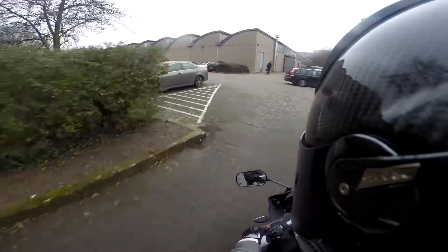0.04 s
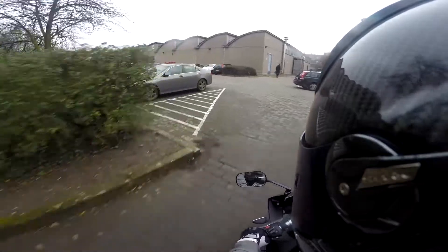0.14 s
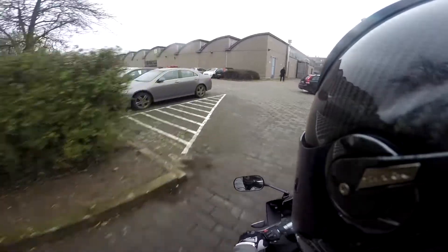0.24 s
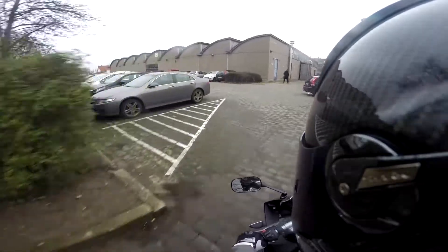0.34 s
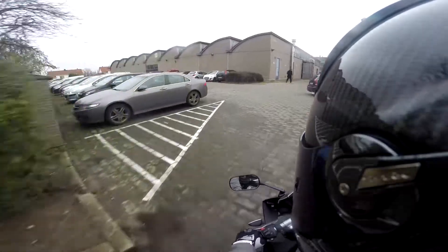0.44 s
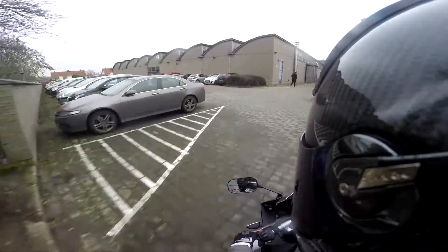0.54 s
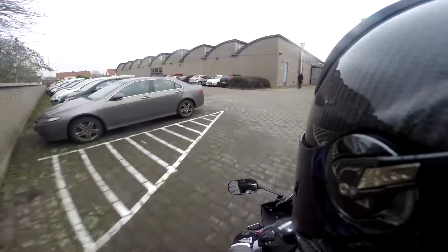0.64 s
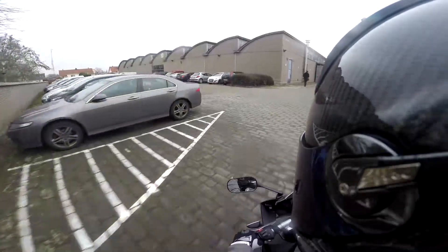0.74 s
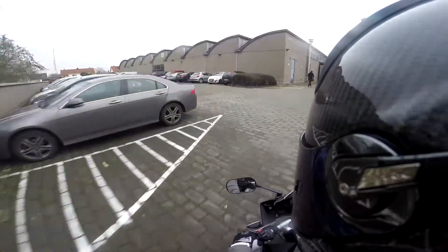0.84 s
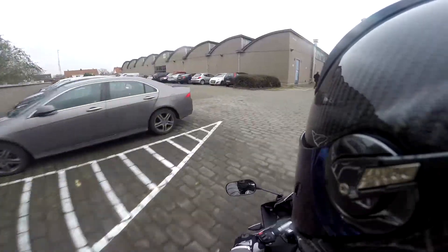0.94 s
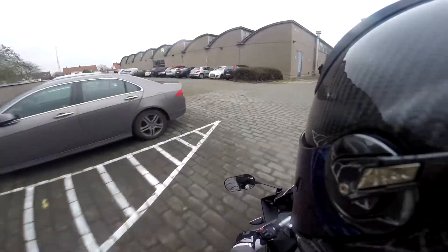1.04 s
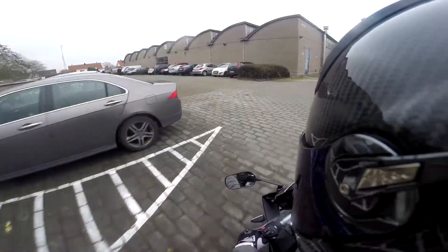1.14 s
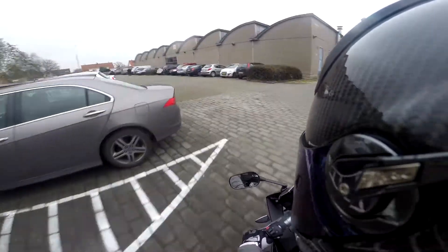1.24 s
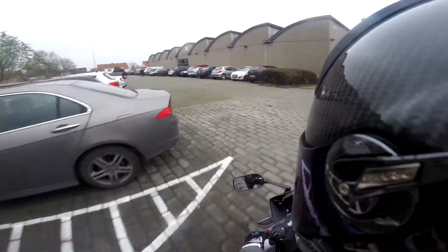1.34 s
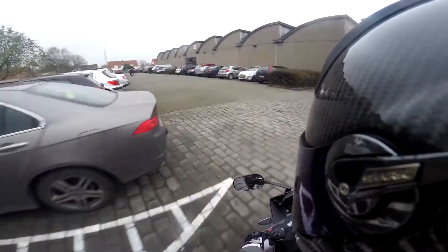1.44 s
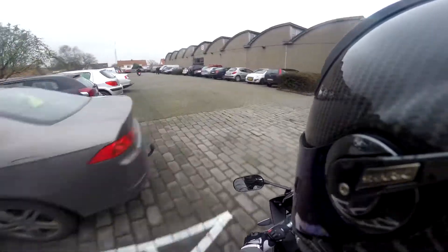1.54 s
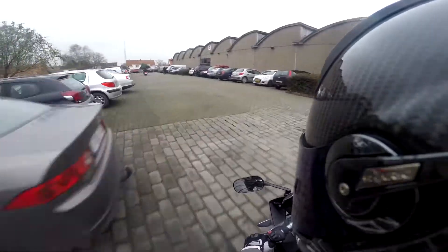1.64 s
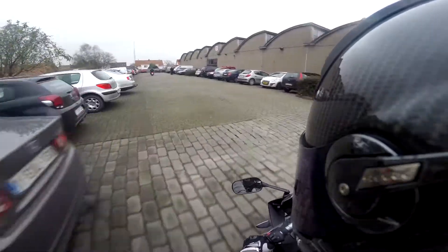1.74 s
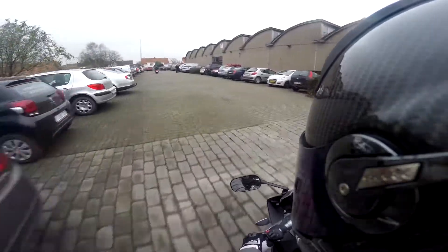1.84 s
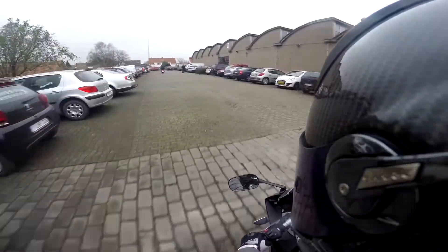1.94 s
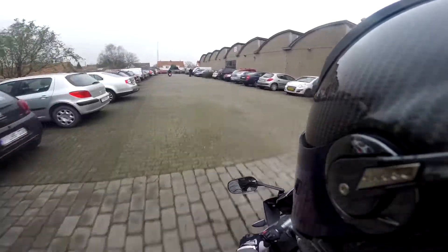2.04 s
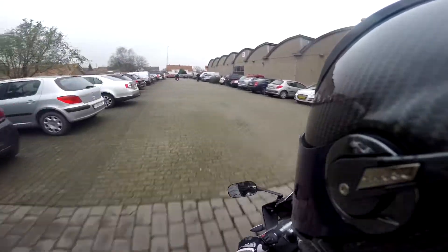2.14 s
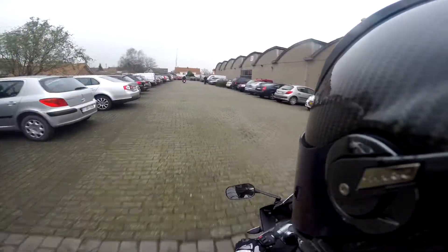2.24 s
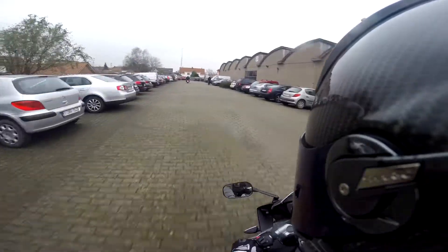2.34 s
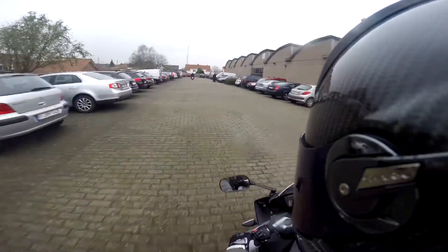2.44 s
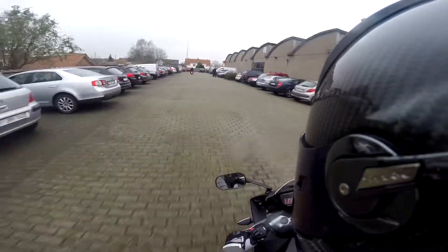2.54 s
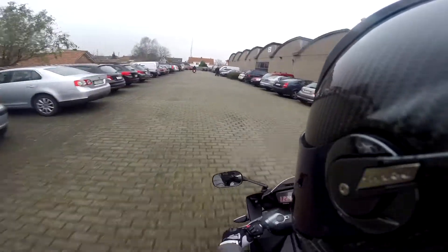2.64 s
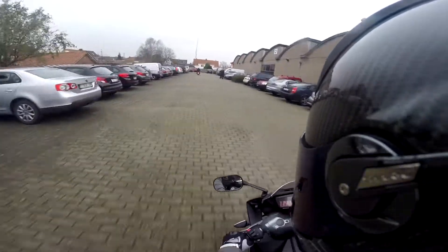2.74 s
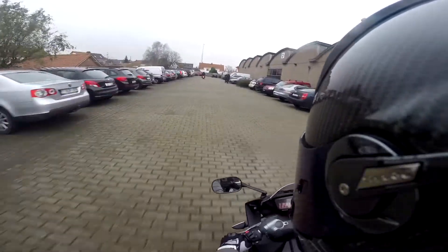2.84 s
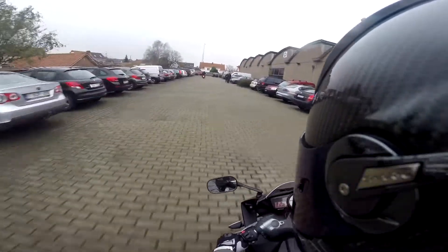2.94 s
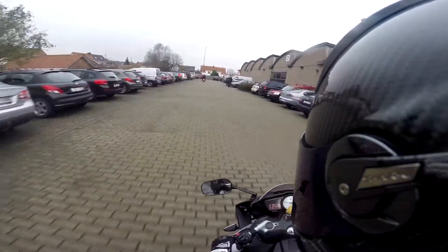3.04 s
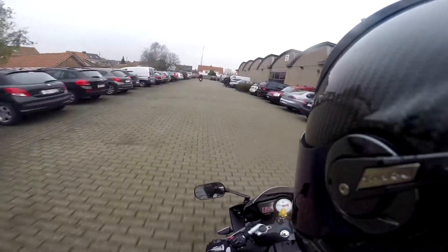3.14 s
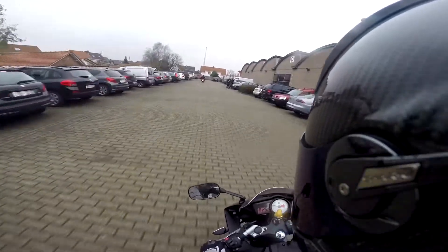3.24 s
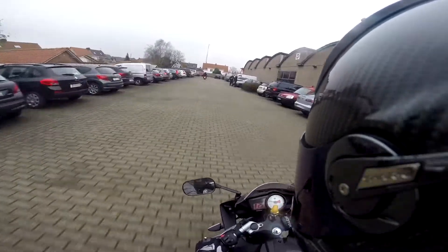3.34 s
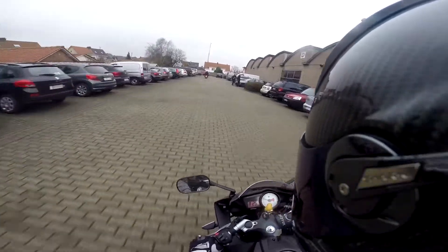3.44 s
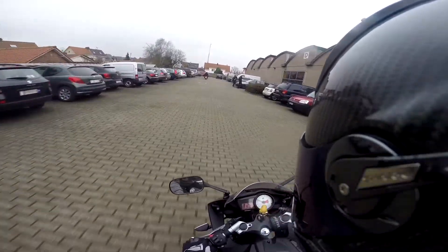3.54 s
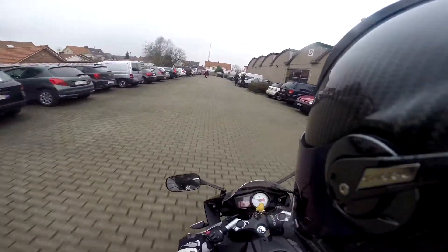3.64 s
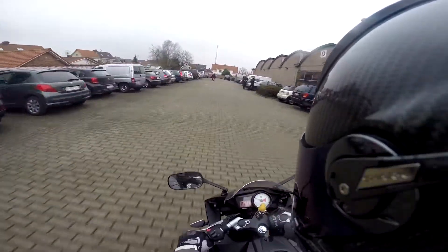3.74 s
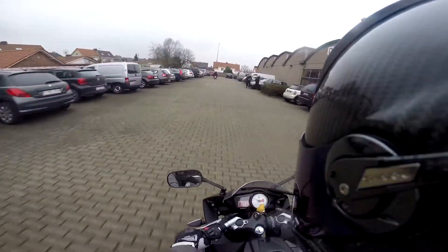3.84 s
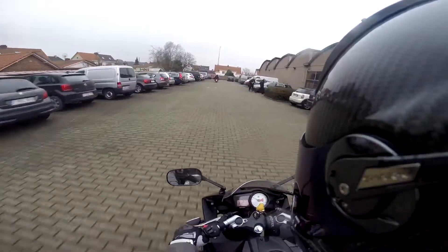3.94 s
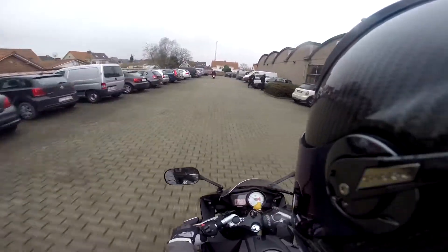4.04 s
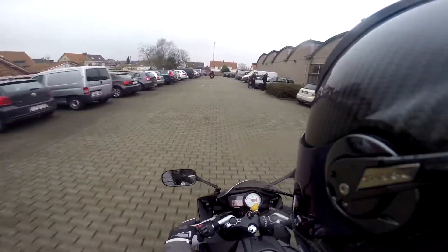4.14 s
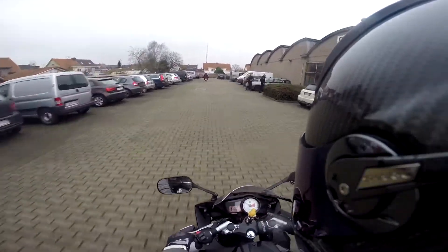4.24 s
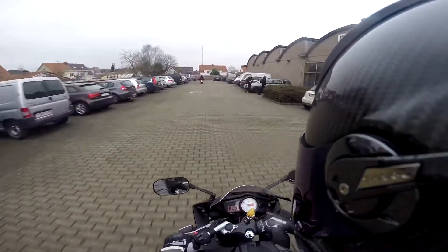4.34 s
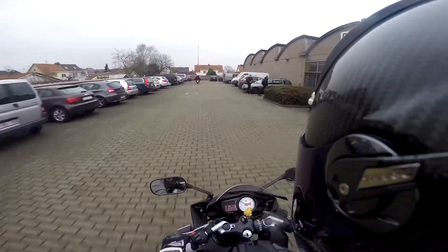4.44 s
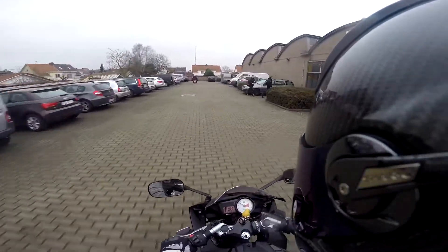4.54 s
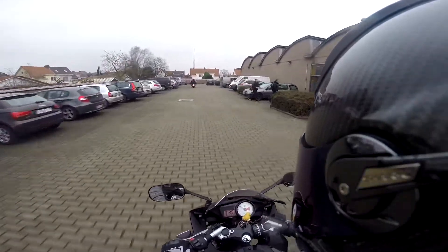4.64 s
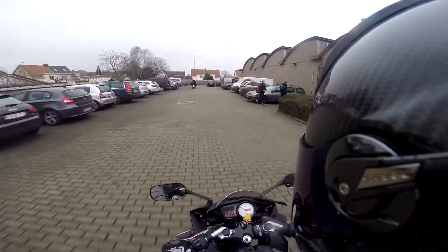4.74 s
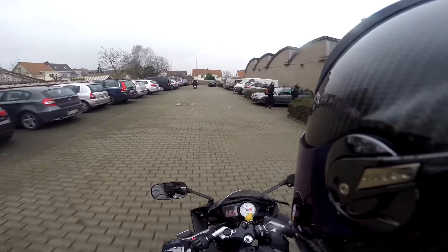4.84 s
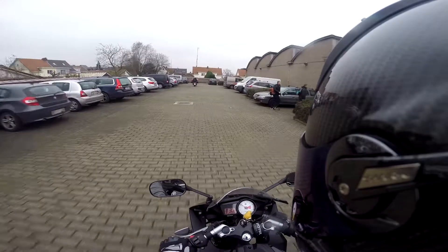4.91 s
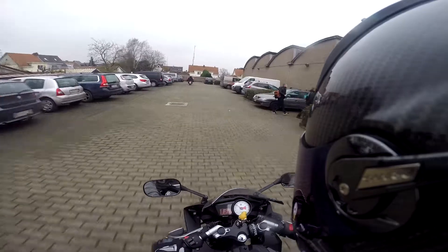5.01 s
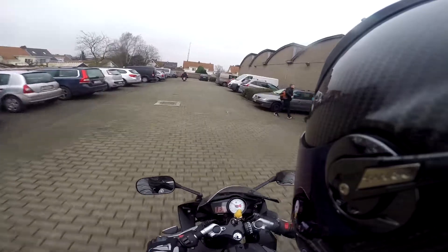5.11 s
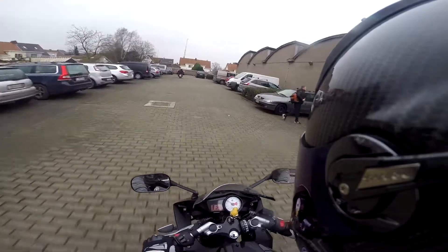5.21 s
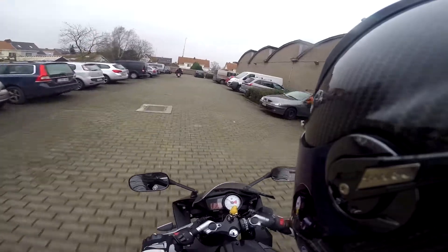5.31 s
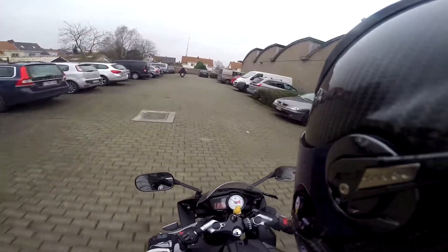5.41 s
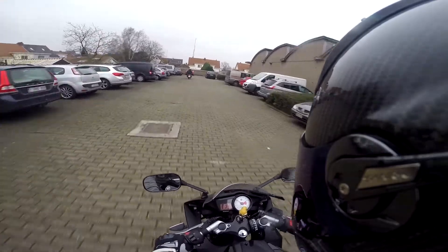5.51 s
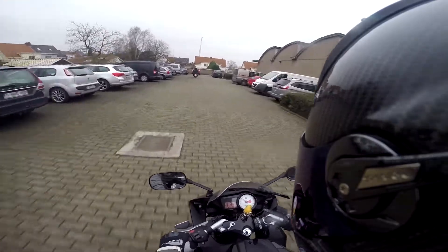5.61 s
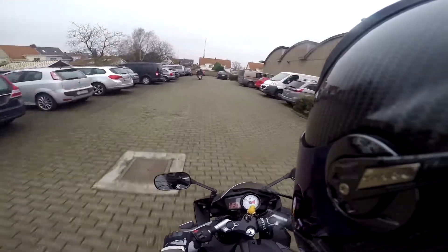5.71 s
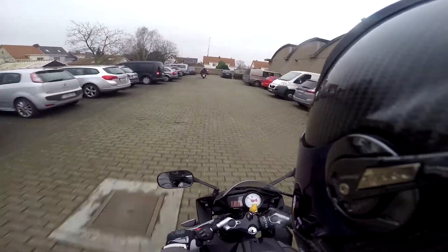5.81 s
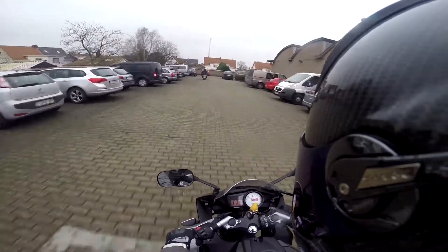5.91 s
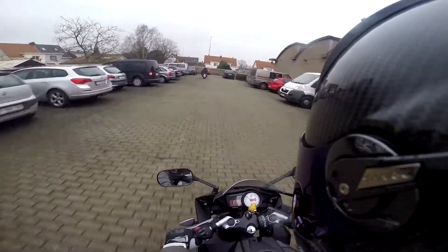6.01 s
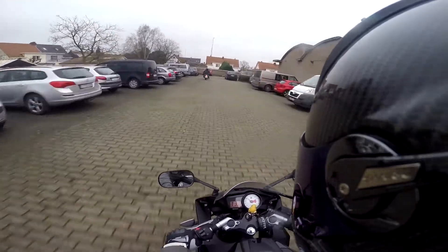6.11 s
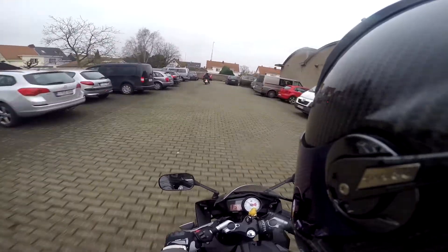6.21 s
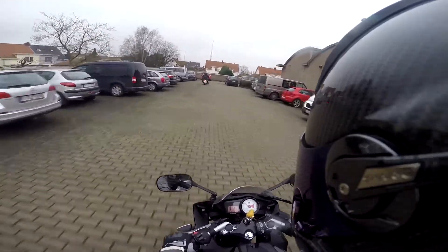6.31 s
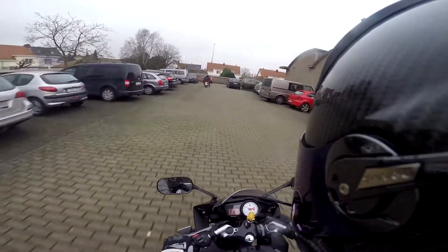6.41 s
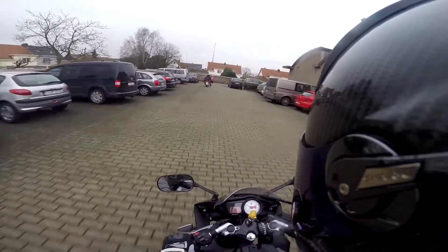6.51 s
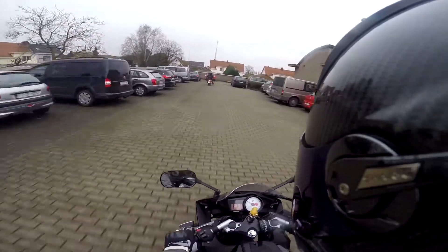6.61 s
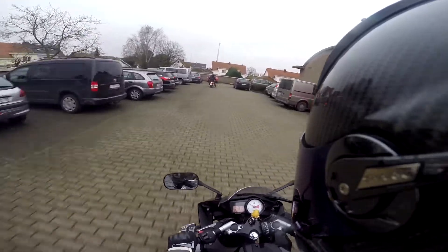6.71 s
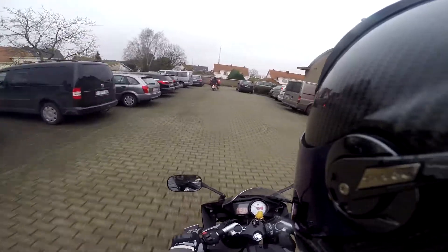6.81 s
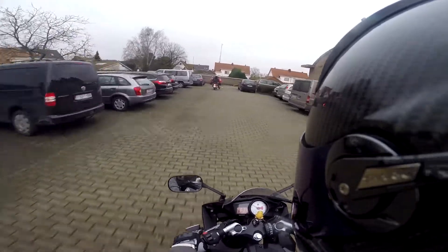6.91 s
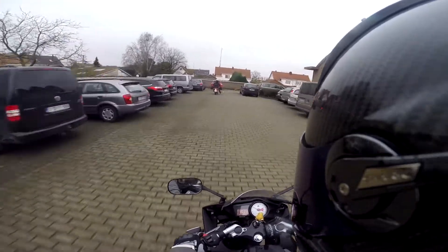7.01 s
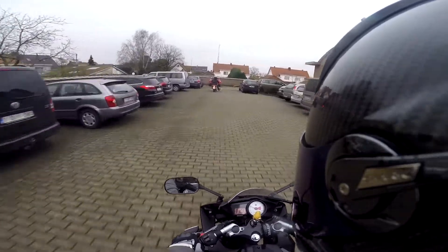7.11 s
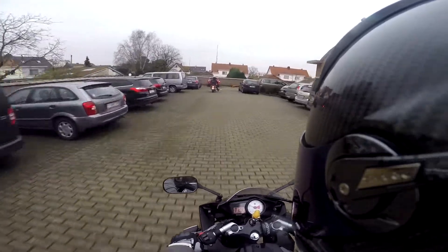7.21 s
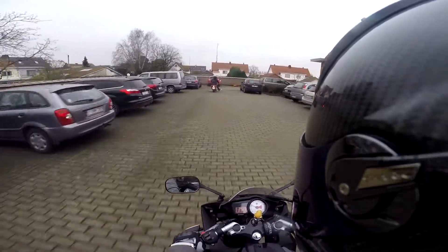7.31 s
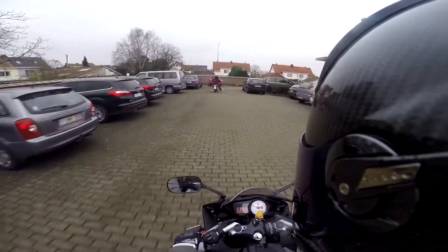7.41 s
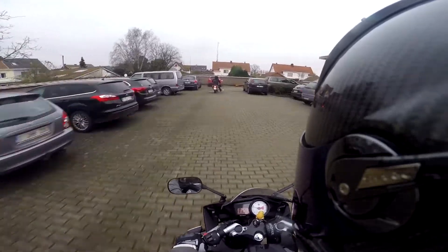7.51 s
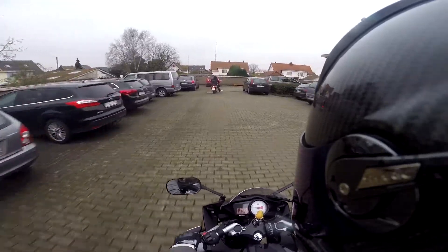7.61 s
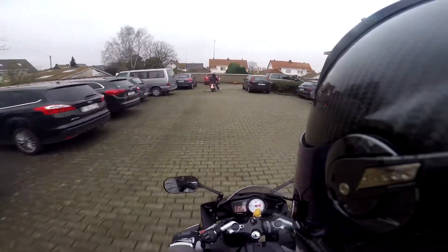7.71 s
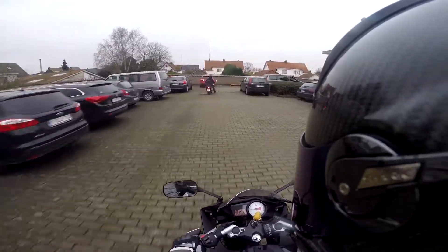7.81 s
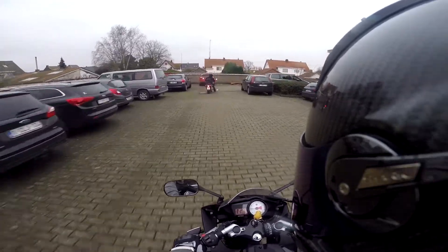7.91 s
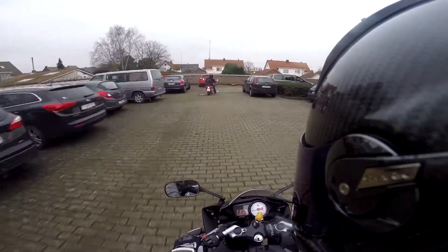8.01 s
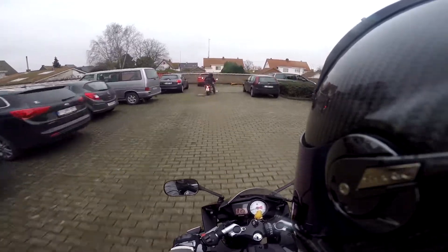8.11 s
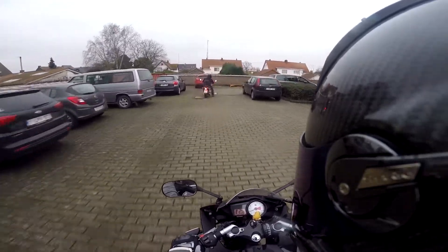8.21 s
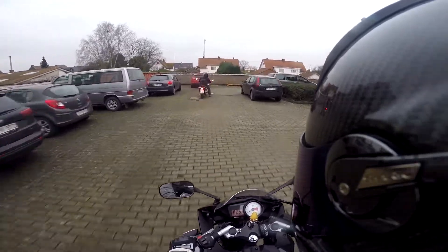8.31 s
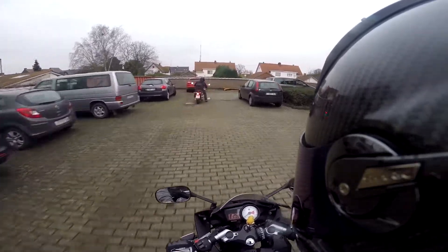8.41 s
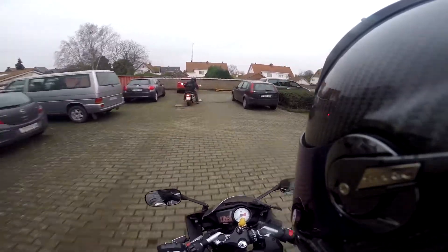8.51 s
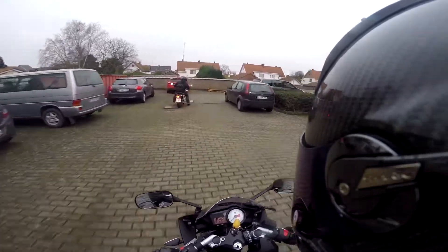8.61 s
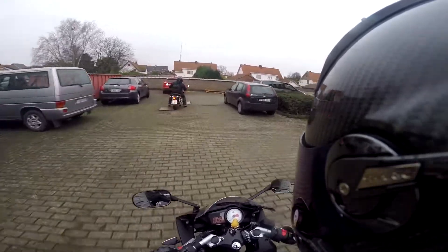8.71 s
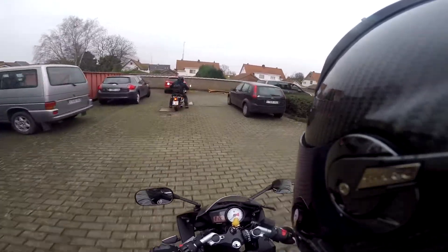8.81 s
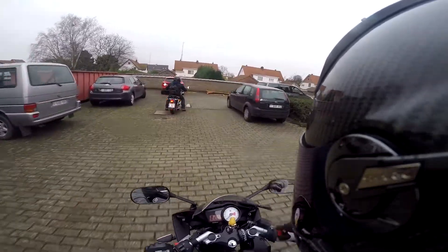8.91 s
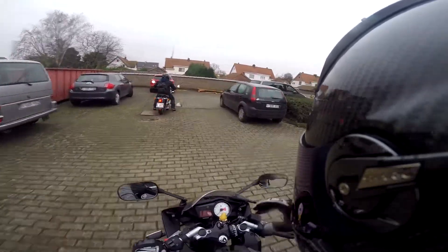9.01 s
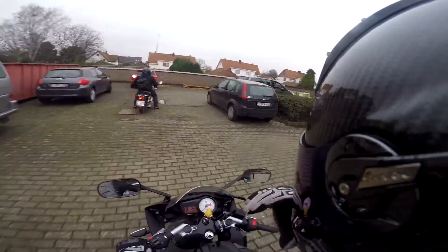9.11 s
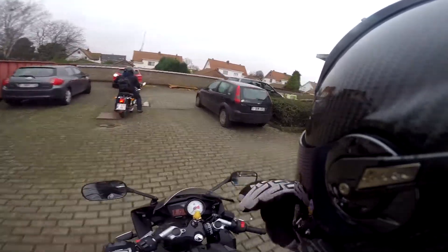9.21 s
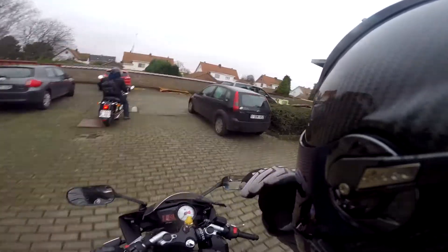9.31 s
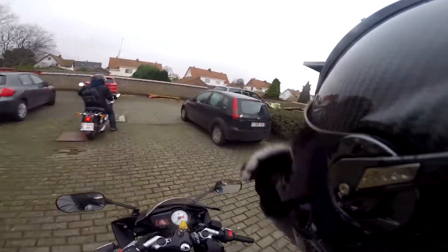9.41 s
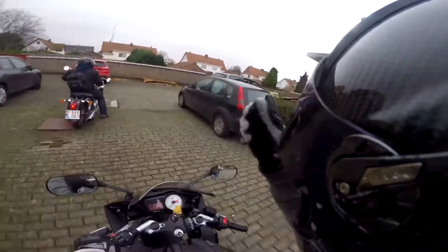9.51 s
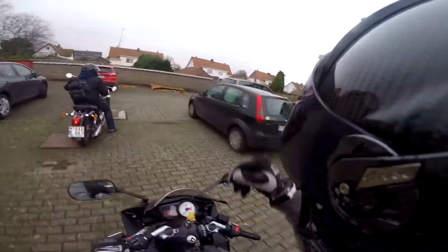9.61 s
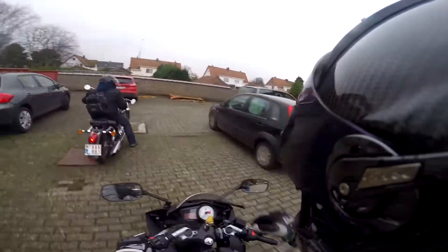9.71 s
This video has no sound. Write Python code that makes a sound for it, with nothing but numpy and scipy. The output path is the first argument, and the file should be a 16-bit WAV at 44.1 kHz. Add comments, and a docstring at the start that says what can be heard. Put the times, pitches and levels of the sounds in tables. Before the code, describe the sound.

A single-cylinder motorcycle putters through a paved car park under strong wind hiss, slows to idle, then a hand knocks loudly on the camera.

```python
"""A single-cylinder motorcycle rolls through a paved car park, heard by a helmet camera in a sealed housing.
It starts with a faint whirr; each firing rings the pipe and barks while the throttle is open. As the wind rises
it hisses in the housing's resonances, the mount shudders in the deep bass and grit ticks. When the throttle
shuts the bark dies; a rough hum and a squeak mark the braking, and at the stop a gloved hand brushes and knocks
the camera. A faint electronic whine and preamp hiss run throughout."""
import sys
import numpy as np
from scipy import signal
from scipy.fft import rfft, irfft
from scipy.io import wavfile
from scipy.ndimage import uniform_filter1d

SR = 44100
rng = np.random.default_rng(int(sys.argv[2]) if len(sys.argv) > 2 else 0)


def master_out(mix):
    """Clip the mix to full scale and print it as 16-bit PCM to the path in sys.argv[1]."""
    frames = np.transpose(np.atleast_2d(mix))
    ceiling = np.clip(frames, -1, 1)
    pcm = np.round(ceiling * 32767).astype(np.int16)
    wavfile.write(sys.argv[1], SR, pcm)


N = 429975
T = np.arange(N) / SR  # time of every sample [s]

# Firing rate before surge and wander: (time [s], rate [Hz])
FIRING_RATE = [(0.0, 32.02), (0.37, 32.05), (0.6, 29.09), (0.85, 29.23), (1.12, 31.37), (1.25, 29.93),
               (1.68, 29.98), (2.17, 31.55), (3.13, 37.15), (3.37, 39.2), (4.2, 41.69), (4.42, 42.71),
               (4.9, 43.42), (6.05, 42.78), (6.38, 38.23), (6.5, 41.53), (6.72, 38.81), (7.2, 37.16),
               (7.5, 32.69), (8.1, 17.95), (8.65, 13.86), (9.75, 13.68)]
# Surge as the chain winds and unwinds under pull: (first dip [s], middle [s], half span [s])
SURGE_SPAN = (2.17, 3.0, 1.15)
# Firings of set strength: (time [s], level [dB])
WEAK_FIRINGS = [(.415, -10), (6.19, -7)]
# Engine at the microphone: (time [s], pipe level [dB], bark level without rasp [dB])
ENGINE_LEVEL = [(0, -45.5, -53), (.9, -42, -47), (1.8, -44, -48), (2.3, -41.5, -45.5), (2.65, -40.5, -42.5),
                (3.4, -38.5, -42), (4.3, -43.5, -44.5), (5.1, -45.5, -46), (6.16, -44.5, -47.5),
                (6.19, -47, -56), (6.32, -41, -79), (7.0, -41, -65), (7.2, -40, -71), (7.55, -41, -70),
                (7.85, -47.5, -72), (8.3, -48, -75), (9.15, -48, -69)]
# Piston shake at twice the crank speed: (time [s], pulse size [share of a firing])
PISTON_SHAKE = [(0, 0.018), (3.5, 0.013), (4.5, 0.22), (6.15, 0.15), (6.3, 0.37), (7.2, 0.25), (7.7, 0.059),
                (8.1, .01)]
# Pipe resonances, throttle open: (frequency [Hz], width [Hz], relative level [dB])
PIPE_OPEN = [(82, 44, -3.5), (160.2, 21, 6.5), (211, 28.4, 2)]
# Pipe resonances, throttle shut: (frequency [Hz], width [Hz], relative level [dB])
PIPE_SHUT = [(84, 15, -13), (117, 51, -0.5), (143, 24.5, 7), (185, 25, -31)]
# Pipe rings that fade as the revs rise: (frequency [Hz], width [Hz], relative level [dB])
SLOW_PIPE = [(140.4, 28, 4), (177, 19, -8)]
# Pipe ring that comes out at idle: (frequency [Hz], width [Hz], relative level [dB])
IDLE_PIPE = [(205, 35, -15.5)]
# Bark resonances struck by each firing: (frequency [Hz], width [Hz], relative level [dB])
BARK = [(383, 49, -3.5), (439, 49, 4.5)]
# Bark rings that fade as the revs rise: (frequency [Hz], width [Hz], relative level [dB])
SLOW_BARK = [(322, 140, -0.38)]
# Upper bark rung by the gas puffs: (frequency [Hz], width [Hz], relative level [dB])
PUFF_BARK = [(577, 81, -1), (980, 790, -9.5)]
# Ring that each firing strikes cleanly: (frequency [Hz], width [Hz], relative level [dB])
CLEAN_BARK = [(585, 74, -6.5)]
# Rasp on the firings: (time [s], level relative to the bark [dB])
RASP_LEVEL = [(0, -7), (.5, -7.5), (2.0, -9), (2.4, -5.5), (2.9, -6.5), (3.4, -22), (4.5, -18), (6.2, -11)]

# Wind hiss, following road speed: (time [s], level [dB])
WIND_LEVEL = [(0, -58.5), (.65, -52), (.72, -46), (1.1, -43.5), (1.42, -45), (1.63, -48), (1.72, -42),
              (2.1, -41), (2.35, -30.5), (2.75, -34), (2.95, -31.5), (3.45, -29), (3.95, -30.5),
              (4.8, -28.5), (5.03, -30.5), (5.4, -33.5), (5.62, -33.5), (5.82, -33.5), (6.02, -33),
              (6.11, -37), (6.25, -29), (6.65, -34.5), (7.05, -39.5), (7.4, -36), (7.9, -37.5), (8.4, -45),
              (8.87, -45.5), (8.97, -54), (9.2, -50), (9.75, -58.5)]
# Strongest puffs of wind: (time [s], level over the hiss [dB])
WIND_PUFFS = [(.78, 2.5), (.97, 3), (1.05, 2.5), (1.76, 1.5), (2.68, 6), (2.91, 4), (3.23, 3), (4.22, 1),
              (4.64, 2.5), (4.83, 3.5), (5.22, 3), (5.59, 3), (6.44, 0), (6.74, 2.5), (7.63, 1), (7.95, 4),
              (8.21, 4), (8.45, 1.5)]
# Glove brushing over the housing: (time [s], level [dB])
BRUSH_LEVEL = [(9.29, -67), (9.33, -42), (9.365, -45), (9.39, -39), (9.425, -43.5), (9.6, -51), (9.63, -76)]
# Hiss spectrum before the housing: (frequency [Hz], relative density [dB per Hz])
WIND_COLOUR = [(60, -18.5), (200, -18.5), (450, -21.5), (750, -23), (1100, -21), (1900, -12), (2900, -13),
               (4000, -24), (4700, -32), (6300, -32), (6800, -36.5), (9000, -42.5), (15000, -63.5)]
# Resonances of the sealed housing: (frequency [Hz], width [Hz], boost [dB])
HOUSING = [(1581, 177, 19), (2373, 350, 4.5), (3609, 370, 12), (5190, 580, 5.5), (6000, 350, 6)]
# Road rumble spectrum: (frequency [Hz], relative density [dB per Hz])
RUMBLE_COLOUR = [(20, 28), (60, -7), (90, -5), (130, 3), (300, 7.5), (560, -4.5), (750, -1), (1500, -23)]

# Drive of the mount by the road: (time [s], level [dB])
SHUDDER_LEVEL = [(0, -44), (.45, -46), (.7, -38), (1.4, -39), (1.7, -46), (2.2, -37.5), (2.6, -33),
                 (3.3, -46), (3.75, -35), (3.95, -30), (4.12, -25.5), (4.3, -38), (4.5, -30.5),
                 (4.75, -39.5), (5.8, -40), (6.7, -36.5), (7.7, -36), (7.9, -46), (9.17, -40)]
# Frame drumming over the paving joints: (time [s], level [dB])
DRUM_LEVEL = [(0, -64), (.8, -54), (2.2, -52), (2.75, -47), (3.3, -45.5), (3.62, -37.5), (3.8, -46.5),
              (4.2, -56), (4.4, -45), (4.9, -47), (5.9, -48.5), (6.15, -54), (6.3, -46), (6.6, -59),
              (7.0, -57), (7.6, -45), (7.9, -50), (9.1, -56)]
# Jolts that set the mount swinging, road bumps, then shoves of the hand: (time [s], drive level [dB])
JOLTS = [(.645, -23), (0.903, -22), (2.27, -27), (2.462, -20), (3.04, -18.5), (4.37, -19), (9.203, -9),
         (9.338, -7.5), (9.44, 2.2), (9.511, 3.8), (9.539, -7.5), (9.642, -7)]

# Hand on the camera: (time [s], drive level [dB], then low, middle and top groups over that drive [dB])
KNOCKS = [(9.131, -37.5, -20, -12, -21), (9.353, -40, -2, -5, -29), (9.4024, -34, -4, 3, -3),
          (9.436, -13.5, -6, 2, -16.5), (9.4515, -15, -11, -15, -16), (9.47, -32, -19, 7, -17),
          (9.4791, -26.5, -9, -1, -8), (9.4841, -24, -6, -6, -21), (9.498, -17.5, -13, -6, -15),
          (9.5147, -25, 1.5, 5, -10), (9.5191, -13, -12, -2.5, -16), (9.5304, -33, -24, -4, -17),
          (9.5407, -39, 5, 6, -4), (9.5507, -37, -6, -7, -1), (9.568, -53.5, 11, 12, 16),
          (9.582, -59, -4, -9, -13), (9.5996, -48, -12, -10, -3), (9.608, -44.5, -19, -20, 0.5),
          (9.628, -52, -3, -4, -3), (9.702, -45.5, -8, -12, 1)]
# Housing rings in four groups, low to top: (frequency [Hz], width [Hz], relative level [dB])
KNOCK_RINGS = [
    [(110, 29, 29), (307, 27, 29.5), (528, 32, 24)],
    [(909, 21, 18), (1025, 147, 11.5), (1140, 97, 17.5), (1505, 130, 17)],
    [(2380, 160, 20.5), (1920, 760, 7)],
    [(4630, 430, 10.5), (5280, 330, 10), (6360, 590, -13)],
]
# What the housing passes of each group: (lower edge [Hz], upper edge [Hz])
KNOCK_EDGES = [(70, 900), (650, 2530), (1500, 2650), (3300, 9400)]
# Span of the small loose knocks: (start [s], end [s])
RATTLE_SPAN = (9.44, 9.545)
# Loose knocks: (middle drive level [dB], then low, middle and top groups over that drive [dB])
RATTLE_LEVELS = (-32, -6, 2.5, -16.5)

# Grit ticking on the housing: (time [s], drive level [dB])
TICKS = [(1.608, -52), (1.6187, -51), (1.8692, -49), (2.7841, -51), (3.2091, -54), (3.741, -41),
         (4.0816, -48), (4.3375, -48), (5.0474, -46), (6.0295, -47), (6.5251, -46), (7.4106, -55),
         (7.4634, -60), (7.9633, -58), (8.241, -48), (8.336, -50), (8.742, -66)]
# Rings of a tick: (frequency [Hz], width [Hz], relative level [dB])
TICK_RINGS = [(5200, 1500, 28), (9150, 3500, 14), (13300, 2200, -3)]
# Faint whirr at the start: (time [s], level [dB])
WHIRR_LEVEL = [(0, -69), (.1, -59), (.3, -61), (.6, -68), (.8, -90)]
# Bands of the whirr: (frequency [Hz], width [Hz], relative level [dB])
WHIRR_BANDS = [(3070, 150, 1), (5030, 120, -7)]
# Faint rough hum while braking: (time [s], level [dB])
GROAN_LEVEL = [(6.9, -77), (7.3, -57), (7.8, -57.5), (8.2, -66), (8.5, -73)]
# Brake squeak: (time [s], frequency [Hz], peak level [dB], half length [s])
SQUEAK = (8.225, 10950, -62, .022)

THROTTLE_SHUT_S = 6.18
FIRST_FIRING_CYCLES, RISE_S = .3356, .0035  # cycles before the first firing; rise of a pulse
SURGE_HZ, SURGES_PER_S = .65, 3.15
HUNT_HZ = .2  # scale of the random wander of the firing rate
GUST_SPREAD_DB, GUSTS_PER_S = 0.67, 16
PUFF_HALF_S = 0.024
RUMBLE_DB = -47  # level when the hiss stands at -26 dB
MOUNT_HZ, MOUNT_WANDER_HZ = 36.05, 2.2  # middle pitch and its spread
SHUDDER_SPREAD_DB, DRUM_SPREAD_DB = 2.5, 2.2
SWING_HZ, SWING_T60_S, SWING_RISE_S = 35.23, 0.34, 0.035
SCRAPE_DECAY_S, STRIKE_SIZE = 0.0037, 2.2
LINE_CLOCK_HZ, FRAME_HZ = 2926.5, 30000 / 1001
FRAME_GAP = 0.078  # silent share of each frame
LINE_3_DB, LINE_4_DB, LINE_5_DB = -80, -76.5, -81  # third to fifth multiple of the line clock
PREAMP_HISS_DB = -68
TOP_HZ = 15200


def undb(db):
    """Turn dB into gain."""
    return 10 ** (np.asarray(db) / 20)


def unit(x):
    """Scale to rms 1."""
    return x / np.sqrt(np.mean(x ** 2))


def curve(table, column=1):
    """One table column drawn as straight lines through time."""
    points = np.transpose(table)
    return np.interp(T, points[0], points[column])


def noise():
    """White noise of rms 1 over the whole scene."""
    return rng.standard_normal(N)


def ring(x, modes):
    """Sum of resonances (frequency [Hz], width [Hz], level [dB]) driven by x."""
    return sum(undb(db) * signal.lfilter(*signal.iirpeak(hz, hz / width, SR), x) for hz, width, db in modes)


def cut(x, hz, kind):
    """Steep low- or high-pass."""
    return signal.sosfilt(signal.butter(4, hz, kind, fs=SR, output="sos"), x)


def colour(x, points, boosts=()):
    """Shape a noise by a spectrum and resonant boosts, then scale to rms 1."""
    f = np.maximum(np.arange(N // 2 + 1) * SR / N, 1.)
    hz, db = np.transpose(points)
    gain = undb(np.interp(np.log(f), np.log(hz), db))
    for centre, width, boost_db in boosts:
        gain = gain * (1 + (undb(boost_db) - 1) / (1 + (2 * (f - centre) / width) ** 2))
    return unit(irfft(rfft(x) * gain, N))


def walk(rate):
    """Random levels, a new one every 1 / rate seconds, joined by slopes and scaled to rms 1."""
    hold = int(SR / rate)
    steps = np.repeat(rng.standard_normal(N // hold + 1), hold)
    return unit(uniform_filter1d(steps, hold)[:N])


def firing_rate():
    """Firing rate [Hz] that surges with the chain and wanders slightly above 20 Hz."""
    hz = curve(FIRING_RATE)
    dip, middle, half = SURGE_SPAN
    pull = np.exp(-((T - middle) / half) ** 4)
    hz = hz - SURGE_HZ * pull * np.cos(2 * np.pi * SURGES_PER_S * (T - dip))
    return hz + HUNT_HZ * np.gradient(walk(9)) * SR / 9 * (hz > 20)


def engine_pulses(hz):
    """Slightly uneven firings, and the crank and piston strokes that come between and along with them."""
    cycles = np.cumsum(hz) / SR - FIRST_FIRING_CYCLES
    chance = rng.standard_normal((400, 2))[:int(cycles[-1])]
    count = np.arange(len(chance))
    at = np.interp(count + 0.002 * chance[:, 0], cycles, T) - RISE_S
    size_db = 0.96 * chance[:, 1]
    for s, db in WEAK_FIRINGS:
        size_db[np.argmin(abs(at - s))] = db
    firings, strokes = np.zeros(N), np.zeros(N)
    firings[(at * SR).astype(int)] = undb(size_db)
    # the crank turns twice a firing; the idle turn thumps more as speed rises
    strokes[(np.interp(count + .5, cycles, T) * SR).astype(int)] = 1
    strokes *= np.clip(0.046 * (hz - 31), 0, .9)
    # four piston turnarounds a firing feed the fourth multiple
    turns = (np.interp(np.arange(4 * len(chance)) / 4, cycles, T) - RISE_S) * SR
    turns = turns.astype(int)
    strokes[turns] += curve(PISTON_SHAKE)[turns]
    even = np.sqrt(35 / hz)  # offsets the level gained from more pulses per second
    return firings * even, strokes * even


def exhaust_pipe(firings, strokes, slow, hz):
    """Pulses ring one set of pipe resonances with the throttle open and another once it shuts."""
    shut = T > THROTTLE_SHUT_S
    pulses = firings + strokes
    open_pipe = ring(slow, SLOW_PIPE) + ring(pulses * ~shut, PIPE_OPEN)
    shut_pipe = undb(-1.0) * cut(ring(pulses * shut, PIPE_SHUT), 204, "low")
    idle = ring(firings * np.clip((18 - hz) / 3, 0, 1), IDLE_PIPE)
    return unit(cut(open_pipe + shut_pipe, 230, "low") + idle)


def exhaust_bark(firings, slow):
    """Firings strike the bark's resonances, and noisy gas puffs after each one add rasp."""
    bark = ring(firings, BARK) + ring(slow, SLOW_BARK)
    bark = cut(cut(bark, 451, "low"), 580, "low")
    # each gas puff decays over 16 ms
    puffs = signal.lfilter([1], [1, -np.exp(-1 / (0.016 * SR))], firings) * (0.88 + noise())
    puff_rings = unit(cut(ring(puffs, PUFF_BARK), 1430, "low"))
    clean_rings = ring(unit(ring(firings, CLEAN_BARK)), CLEAN_BARK)
    rasp = undb(curve(RASP_LEVEL)) * (puff_rings - clean_rings)
    return rasp - unit(cut(bark, 210, "high"))


def engine():
    """Each firing excites pipe and bark; the bark dies and the pipe drops when the throttle shuts."""
    hz = firing_rate()
    firings, strokes = engine_pulses(hz)
    slow = firings * (T <= THROTTLE_SHUT_S) * np.clip((43 - hz) / 11, .03, 1)
    pipe = undb(curve(ENGINE_LEVEL, 1)) * exhaust_pipe(firings, strokes, slow, hz)
    bark = undb(curve(ENGINE_LEVEL, 2)) * exhaust_bark(firings, slow)
    # each firing reaches the sealed housing as a pull first
    return -pipe - bark


def wind():
    """Gusts, then a brushing glove, are fluttering noise coloured by the housing; road rumble follows a little."""
    wind_db = curve(WIND_LEVEL)
    brush = undb(curve(BRUSH_LEVEL) + 3.0 * walk(40)) * (T > BRUSH_LEVEL[0][0])
    puff_db = sum(db * np.exp(-np.square((T - s) / PUFF_HALF_S)) for s, db in WIND_PUFFS)
    gusts = undb(wind_db + puff_db + GUST_SPREAD_DB * walk(GUSTS_PER_S))
    flutter = undb(0.2 * walk(25) + 0.72 * walk(90))
    hiss = colour(flutter * noise(), WIND_COLOUR, HOUSING)
    rumble = undb(RUMBLE_DB + 0.084 * (wind_db + 26)) * colour(noise(), RUMBLE_COLOUR)
    return np.hypot(gusts, brush) * hiss + rumble


def mount():
    """The mount is a soft spring: it wobbles near its own pitch, jolts set it swinging, the frame drums above."""
    wobble = np.sqrt(2) * np.sin(2 * np.pi * np.cumsum(MOUNT_HZ + MOUNT_WANDER_HZ * walk(9)) / SR)
    drum = unit(ring(ring(noise(), [(87.0, 12.6, 0)]), [(86.6, 24, 0)]))
    drum_db = curve(DRUM_LEVEL) + DRUM_SPREAD_DB * walk(9)
    shudder = undb(curve(SHUDDER_LEVEL) + SHUDDER_SPREAD_DB * walk(14))
    rough = unit(cut(ring(noise(), [(32.1, 15, 0)]), 51.4, "low"))
    moving = shudder * (0.69 * wobble + 0.53 * rough)
    swing = 0
    for s, db in JOLTS:
        since = np.maximum(T - s, 0)
        envelope = undb(db - 60 * since / SWING_T60_S) * (1 - np.exp(-since / SWING_RISE_S))
        swing = swing - envelope * np.sin(2 * np.pi * SWING_HZ * since)
    swing = swing + 0.34 * cut(swing ** 2, 45, "high")  # stiffer one way than the other
    return moving + swing + undb(drum_db) * drum


def hand():
    """Each knock, large or loose, is a strike and a short noisy scrape that ring four groups in the housing."""
    loose = []
    for place, strength in rng.random(size=(30, 2)):
        s = np.interp(place, (0, 1), RATTLE_SPAN)
        loose.append((s, RATTLE_LEVELS[0] + 4.9 * (strength - .5), *RATTLE_LEVELS[1:]))
    knocks = [*KNOCKS, *loose]
    scrapes = rng.standard_normal((len(knocks), 1500))
    t = np.arange(1500) / SR
    scrape_shape = np.exp(-t / SCRAPE_DECAY_S) * np.minimum(t / 0.00049, 1)
    strike = STRIKE_SIZE * np.exp(-t / .00008)
    drive = np.zeros((4, N))
    for (s, db, low, mid, top), scrape in zip(knocks, scrapes):
        i = int(s * SR)
        group_gain = undb([db + low, db + mid, db, db + top])
        drive[:, i:i + 1500] += group_gain[:, None] * (scrape * scrape_shape + strike)
    total = 0
    for group, modes, (lower, upper) in zip(drive, KNOCK_RINGS, KNOCK_EDGES):
        rings = cut(cut(ring(group, modes), upper, "low"), upper, "low")
        total = total + cut(rings, lower, "high")
    return total


def grit():
    """Single clicks ring brightly on the housing."""
    clicks = np.zeros(N)
    for s, db in TICKS:
        clicks[int(s * SR)] = undb(db)
    return ring(clicks, TICK_RINGS)


def brakes():
    """A narrow band of noise makes the rough hum, and a swelling sine the one short squeak."""
    groan = undb(curve(GROAN_LEVEL)) * unit(ring(noise(), [(448, 89, 0)]))
    s, hz, db, half = SQUEAK
    squeak = undb(db) * np.exp(-np.square((T - s) / half)) * np.sin(2 * np.pi * hz * T)
    return groan + squeak


def whirr():
    """Two narrow bands of noise whirr faintly at the start."""
    return undb(curve(WHIRR_LEVEL)) * unit(ring(noise(), WHIRR_BANDS))


def electronics():
    """Multiples of a sensor line clock restart every frame, silent for a short gap, over preamp hiss."""
    share = T * FRAME_HZ % 1
    since = share / FRAME_HZ
    whine = 0
    for multiple, db in [(3, LINE_3_DB), (4, LINE_4_DB), (5, LINE_5_DB)]:
        whine = whine + undb(db) * np.sqrt(2) * np.sin(2 * np.pi * multiple * LINE_CLOCK_HZ * since)
    gate = uniform_filter1d(1. * (share > FRAME_GAP), size=30)
    hiss = colour(noise(), [(100, 5), (5000, 14.5), (10000, -29.5), (15000, -32)])  # (Hz, dB per Hz)
    return gate * whine + undb(PREAMP_HISS_DB) * hiss


def scene():
    """Everything reaches one microphone."""
    ride = engine() + wind() + mount()
    return (ride + hand() + grit() + brakes() + whirr() + electronics())[None]


def record(dry):
    """The camera cuts the top with a very steep low-pass."""
    return signal.sosfilt(signal.ellip(10, .2, 80, TOP_HZ, fs=SR, output="sos"), dry)


dry = scene()
out = record(dry)
master_out(out)
```